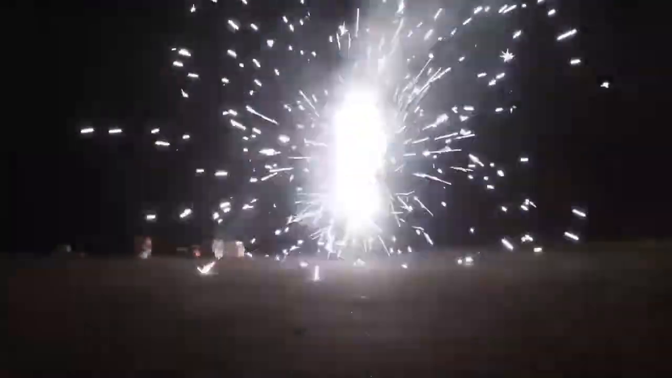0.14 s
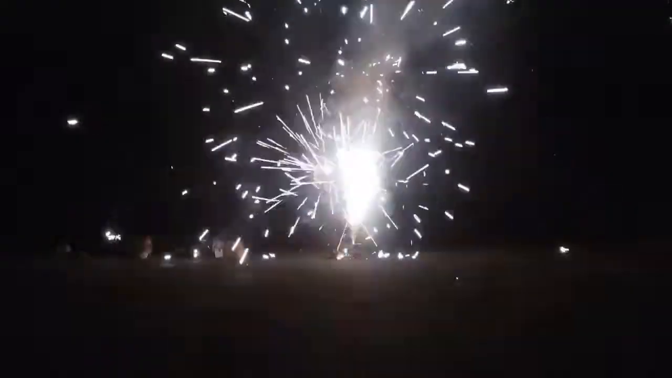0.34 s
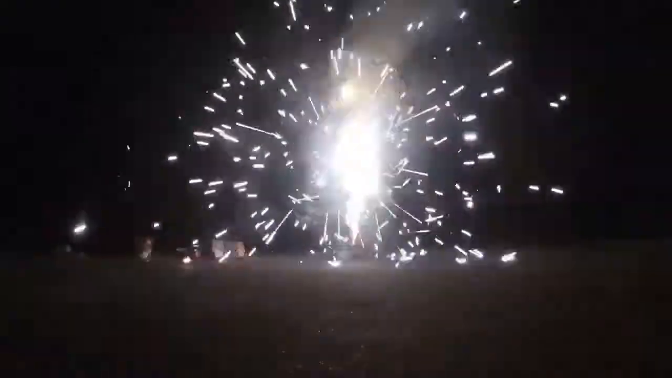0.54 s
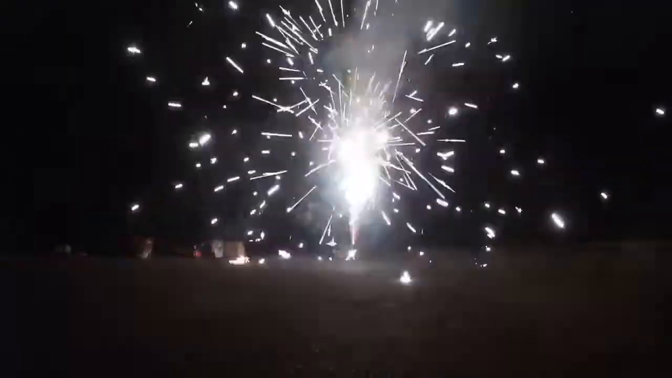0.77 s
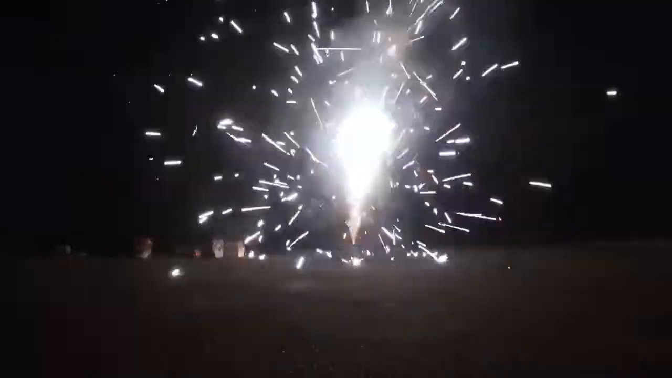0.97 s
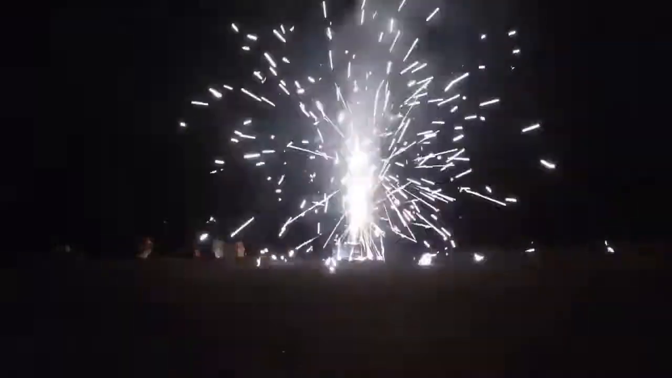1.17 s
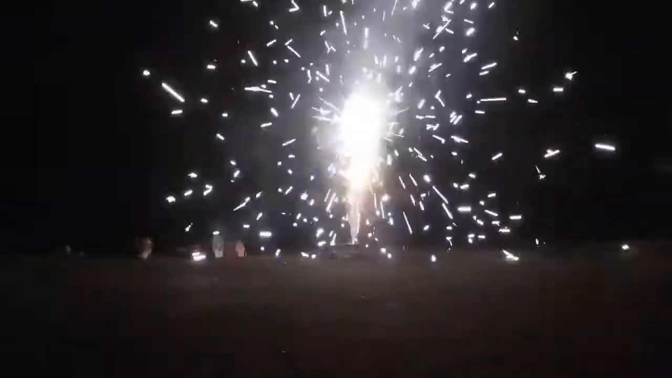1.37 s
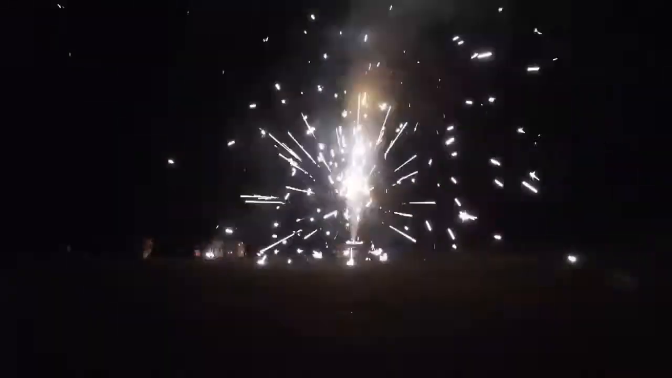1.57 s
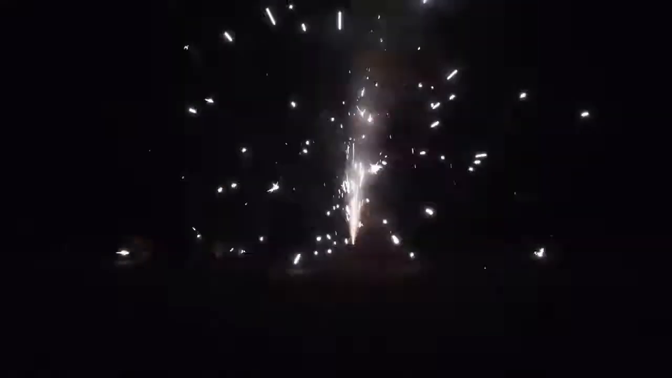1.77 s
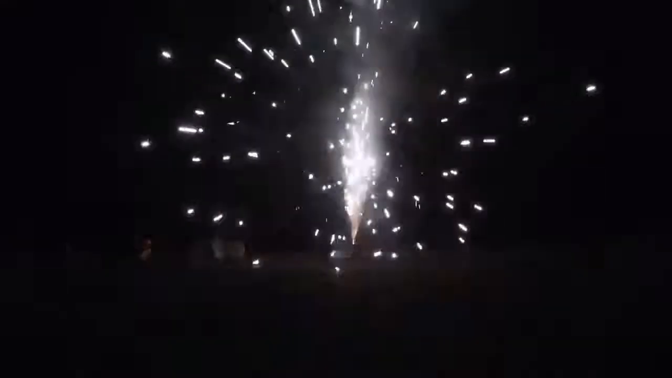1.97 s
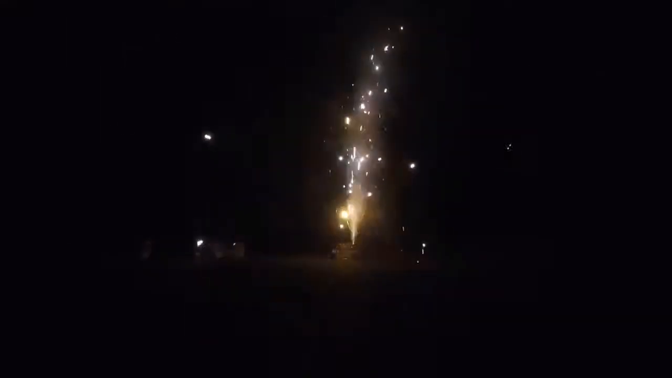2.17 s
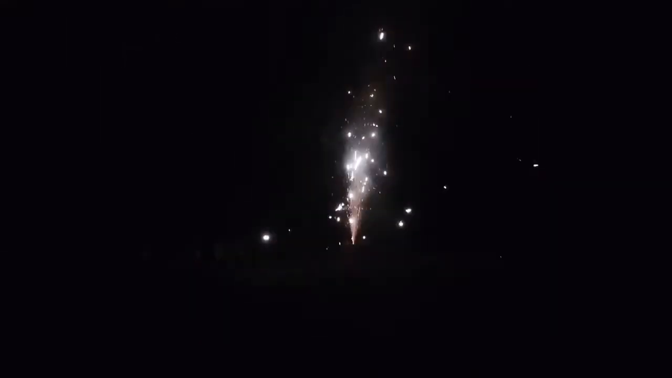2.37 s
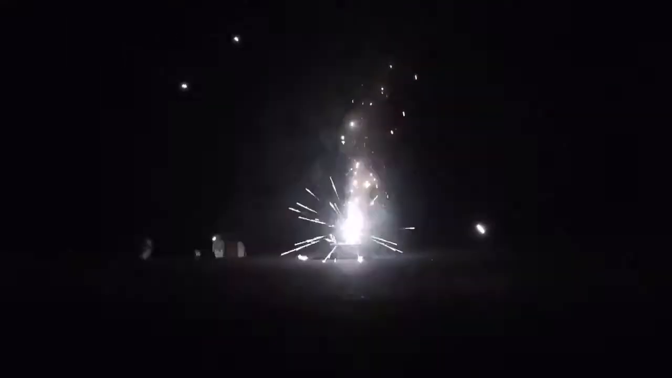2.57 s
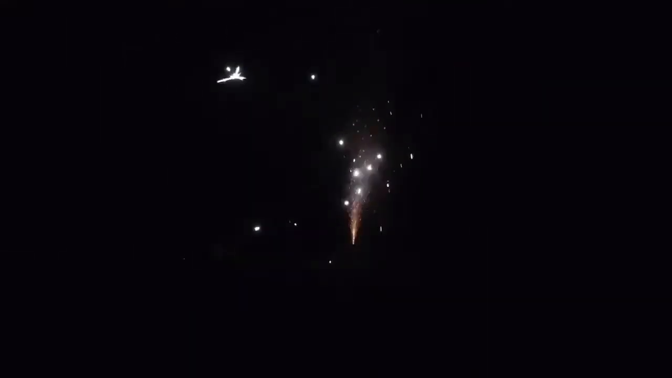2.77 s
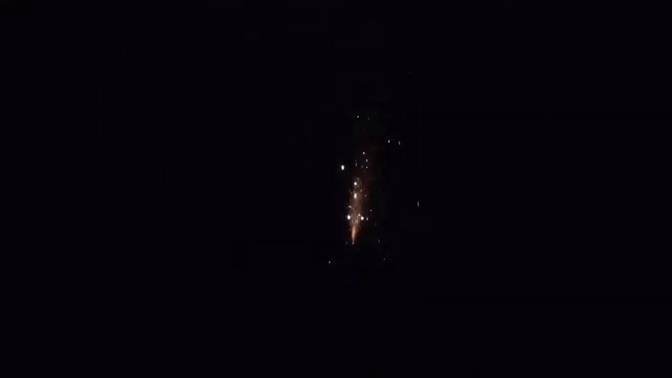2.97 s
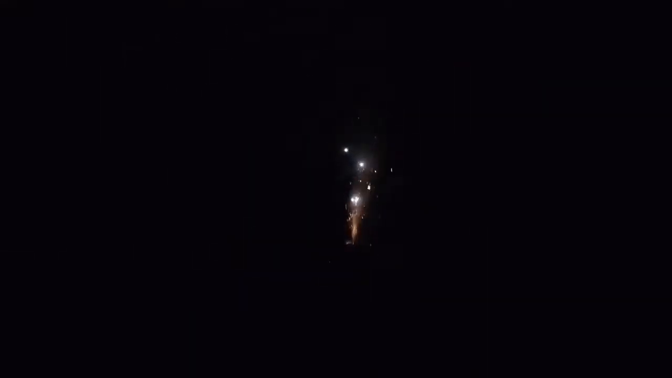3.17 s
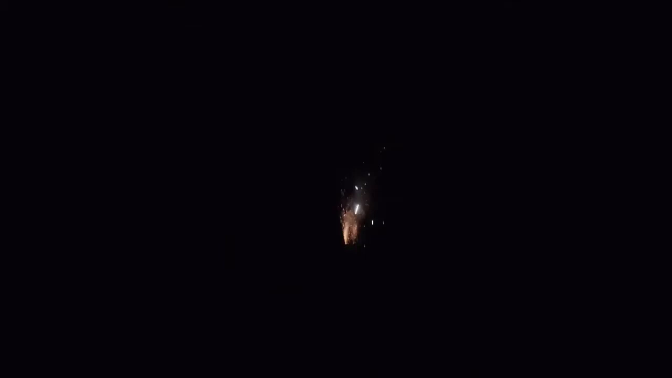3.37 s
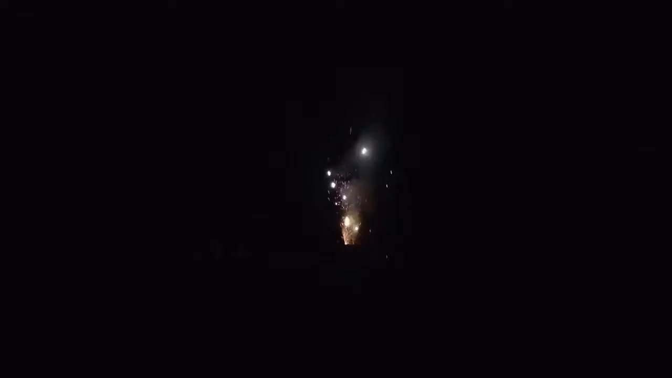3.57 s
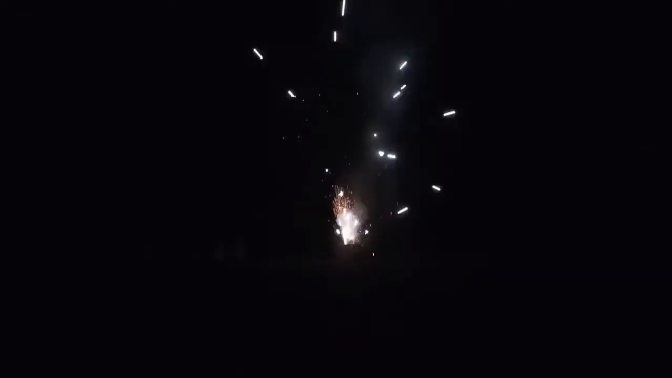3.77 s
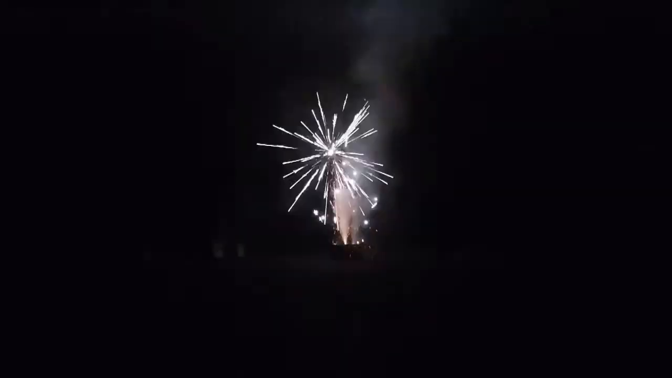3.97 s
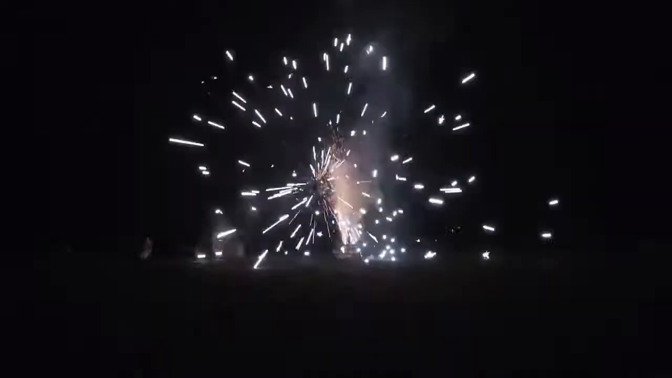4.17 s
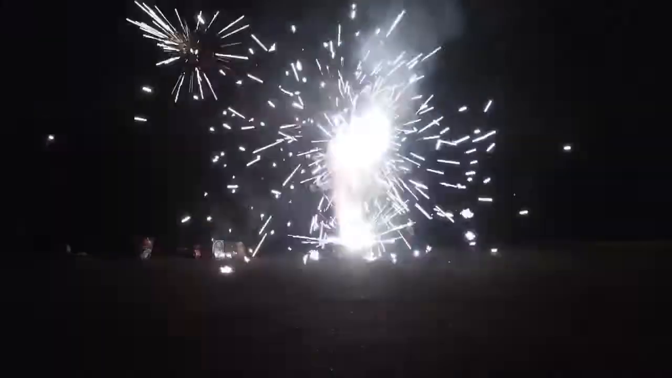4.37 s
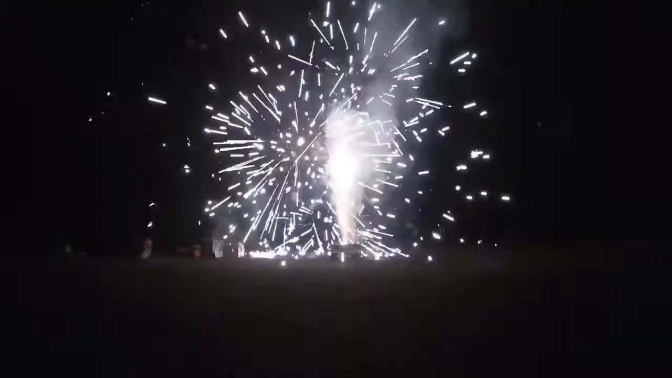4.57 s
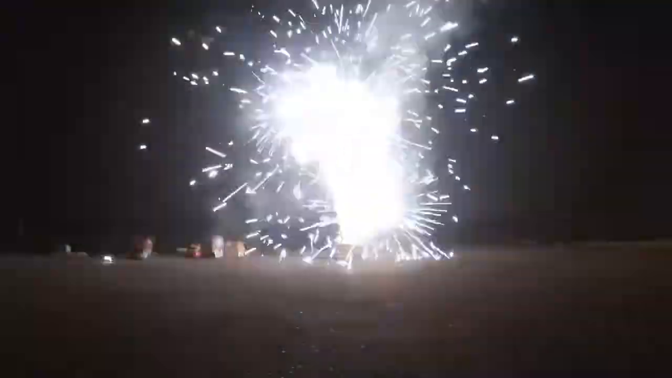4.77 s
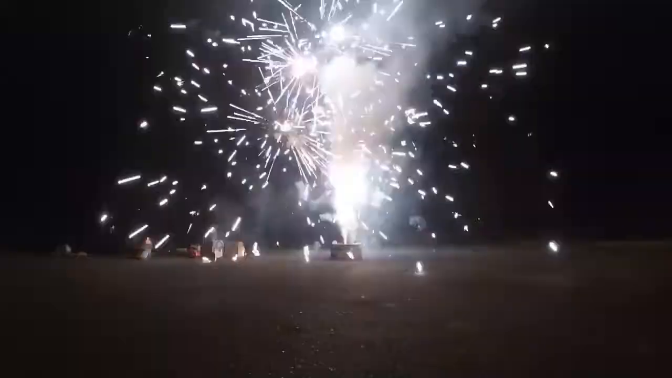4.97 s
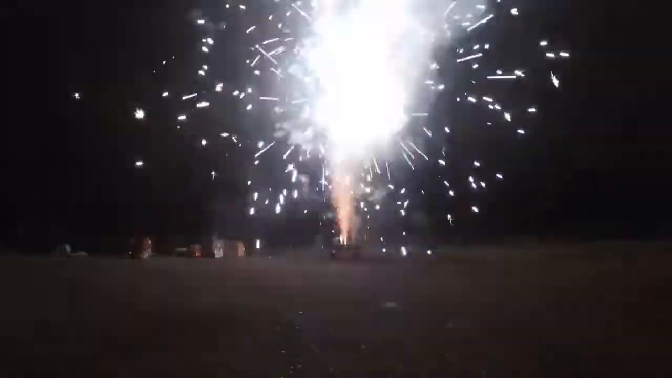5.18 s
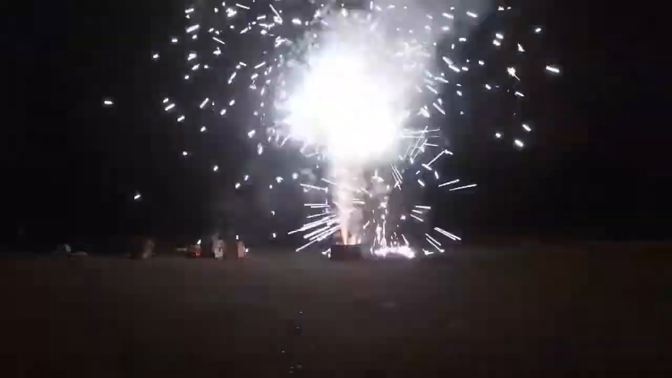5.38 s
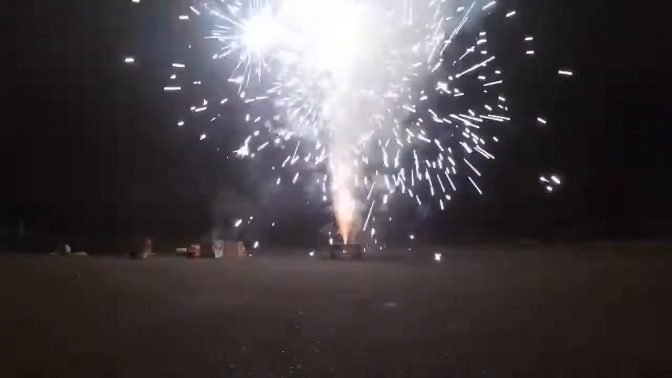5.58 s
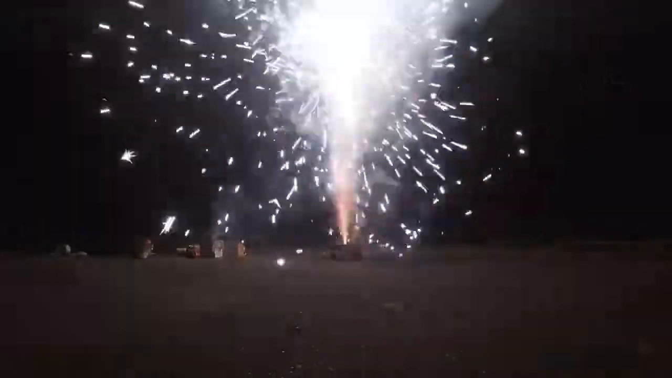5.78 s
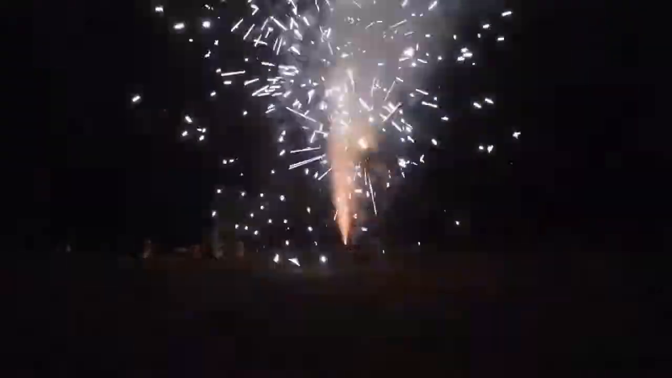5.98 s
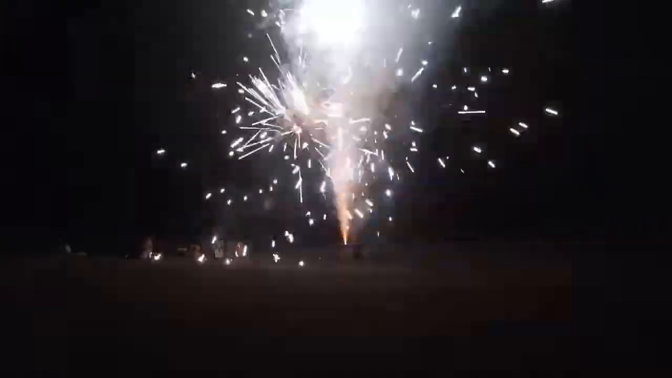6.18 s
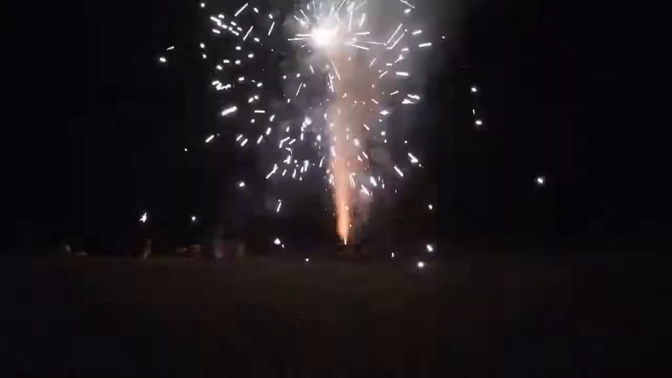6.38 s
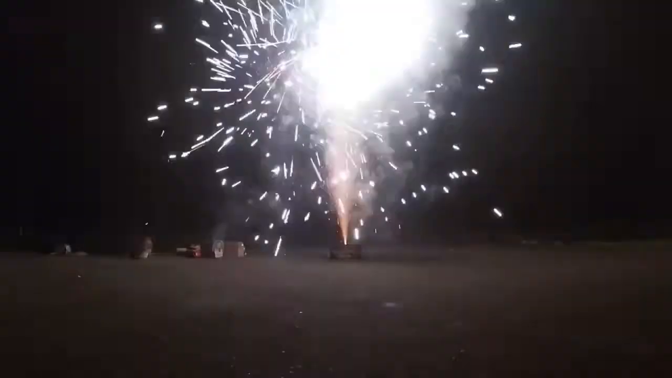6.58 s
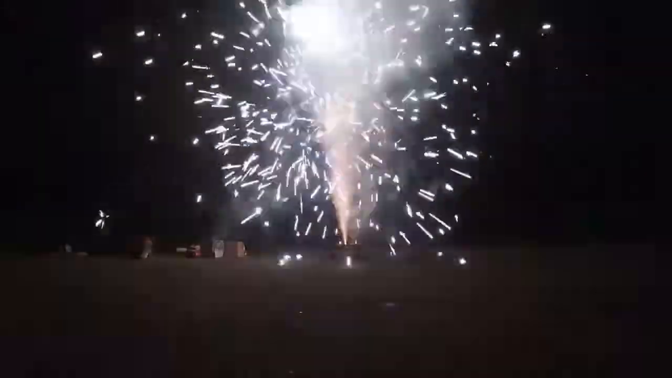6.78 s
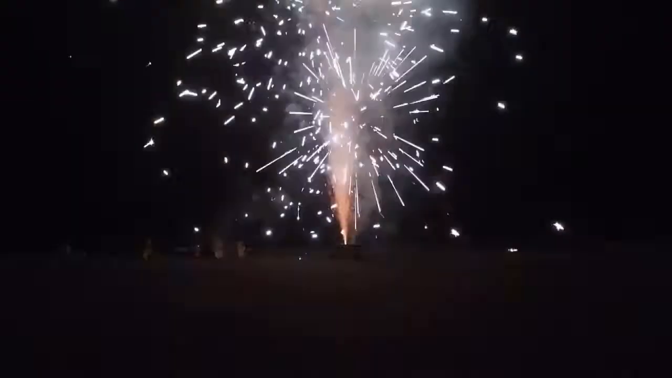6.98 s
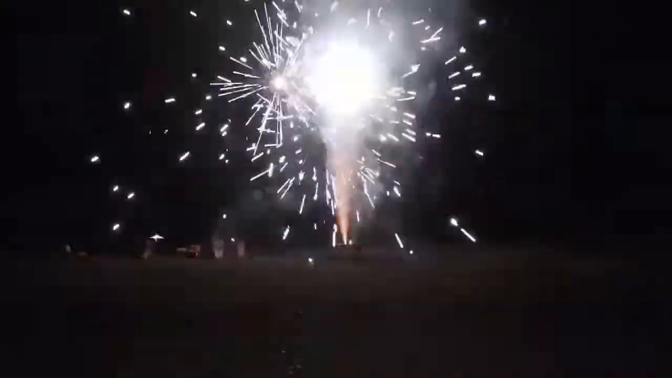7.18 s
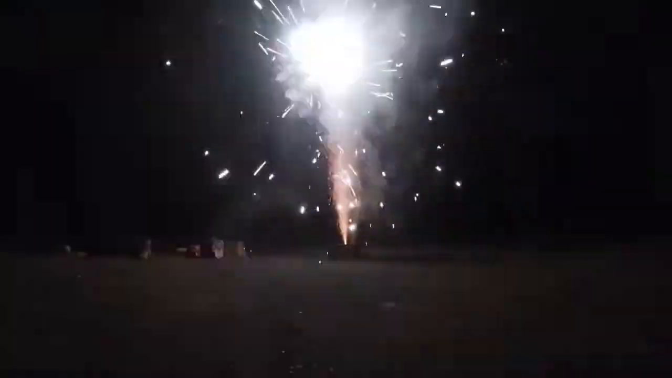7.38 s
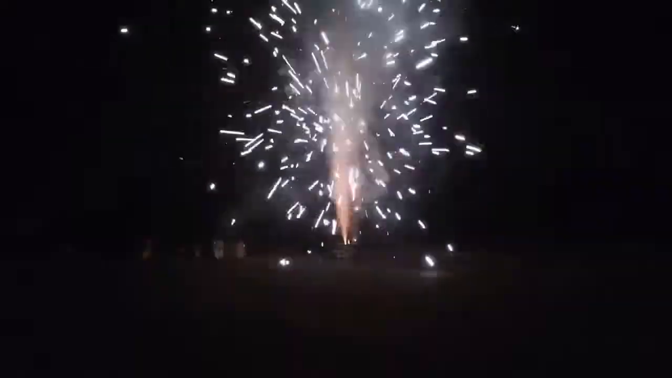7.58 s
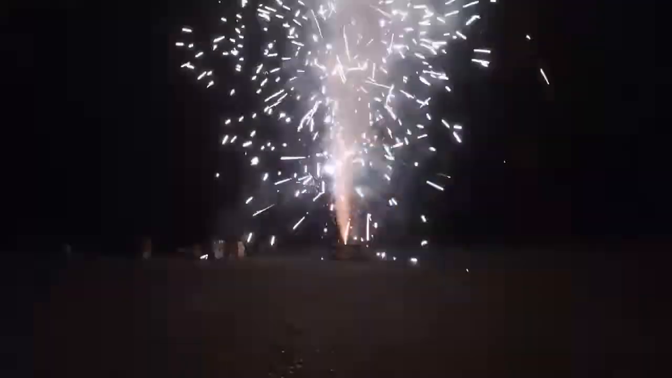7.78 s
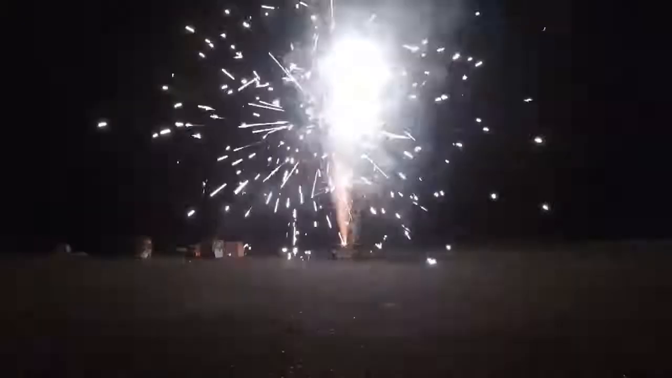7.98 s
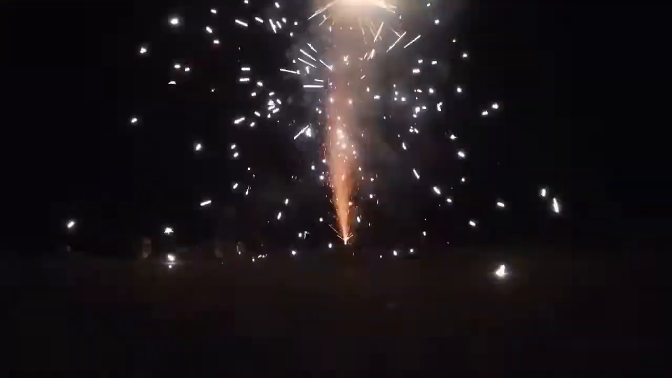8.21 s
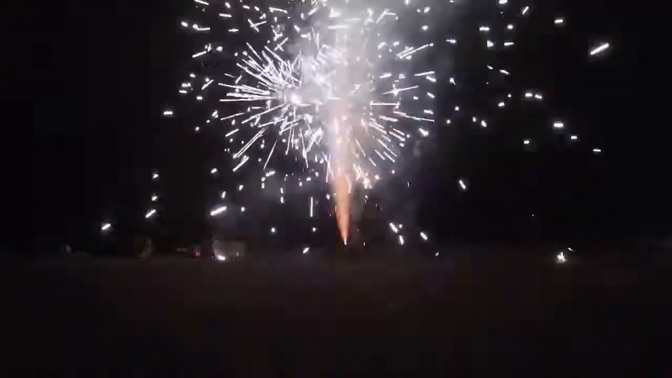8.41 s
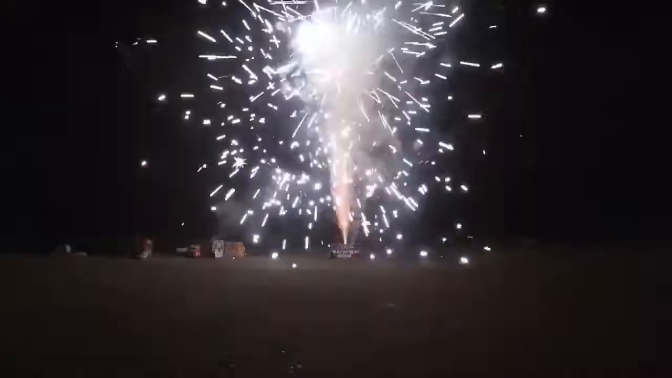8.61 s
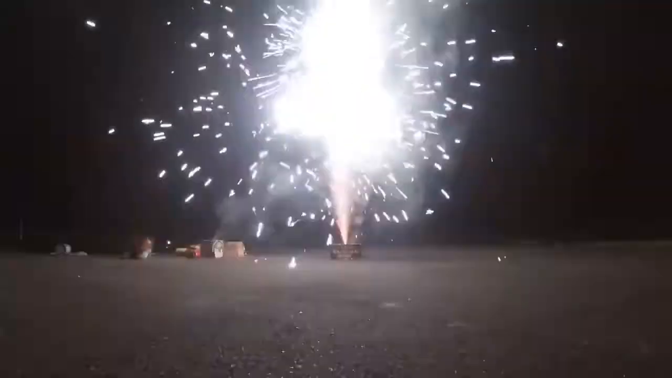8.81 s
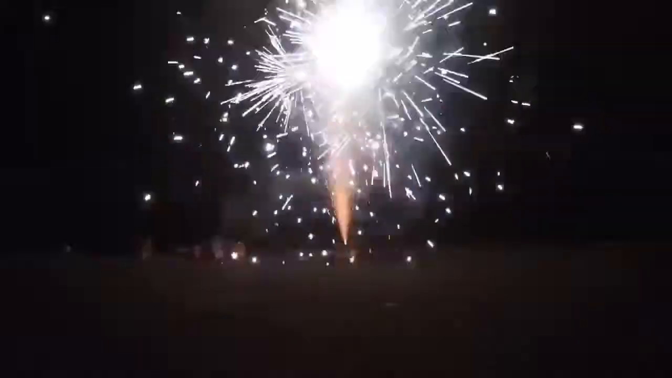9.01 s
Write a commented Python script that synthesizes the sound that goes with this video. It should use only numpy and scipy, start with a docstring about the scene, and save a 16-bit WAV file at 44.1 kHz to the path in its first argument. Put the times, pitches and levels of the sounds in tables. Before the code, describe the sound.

Outdoors at night, harsh, clipped crackles come in rapid uneven clusters, already under way at the start. They die down to sparse dry pops and quiet burning hiss, with swelling spurts of powder that stop abruptly. A denser barrage of bangs follows and never lets up. The close phone microphone distorts, sounding crunchy and thumpy, mid-heavy with dull treble, over a faint low rumble.

```python
"""Fountain firework crackling at night

It stands on open hard ground, a few metres from a phone. Small stars pop as clean blast waves.
Volleys of strong bangs overload the microphone: each crack is folded into a few random swings,
and a slow jolt up or down is left behind. Burning powder hisses in between as coloured noise, a thin
high band of noise shows when the crackle thins out, and a low rumble lies under it all."""
import sys
import numpy as np
from scipy import signal
from scipy.fft import rfft, irfft
from scipy.io import wavfile

SR = 44100
rng = np.random.default_rng(int(sys.argv[2]) if len(sys.argv) > 2 else 0)


def level_to_linear(level):
    """Convert decibel levels to linear amplitude factors, elementwise."""
    exponent = np.asarray(level, float) / 20
    return 10 ** exponent


def store_wav(level_fs):
    """Save 16-bit WAV to argv[1]."""
    pcm = np.round(np.clip(np.atleast_2d(level_fs), -1, 1) * 32767)
    wavfile.write(sys.argv[1], SR, pcm.T.astype(np.int16))


N = 399105  # length [samples]

# how the overload changes over time:
# (time [s], typical size of a folded crack [dB], typical wobble as it settles [dB])
OVERLOAD = [(0.0, -7, -8.5), (1.1, -9, -8), (1.5, -8, -14), (2.1, -5.5, -13), (2.3, -4.5, -6),
            (3.4, -8, -14), (3.7, 0, -20), (4.0, -4.5, -13.5), (4.6, -4, -15), (5.2, -5.5, -16),
            (6.0, -4, -13.5), (7.0, -4, -11), (8.0, -5.5, -13.5), (9.05, -5.5, -8)]
SPLIT_HZ = 6000  # the microphone's treble step


def band(x, hz, kind, order=2):
    """Butterworth filter that never looks ahead in time."""
    return signal.sosfilt(signal.butter(order, hz, kind, fs=SR, output="sos"), x)


def ring(x, hz, width_hz):
    """One resonance, gain 1 at its centre."""
    return signal.lfilter(*signal.iirpeak(hz, hz / width_hz, fs=SR), x)


def unit(x):
    """Scale to an rms of 1."""
    return x / np.sqrt(np.mean(x ** 2))


def curve(table):
    """The second column of a table, drawn as a line through every sample."""
    return np.interp(np.arange(N) / SR, np.array(table)[:, 0], np.array(table)[:, 1])


def spikes(at_s, size):
    """One-sample impulses at the given times."""
    return np.bincount(np.clip((at_s * SR).astype(int), 0, N - 1), size, N)


def play(trigger, shape):
    """Each impulse starts a copy of the shape."""
    return signal.fftconvolve(trigger, shape)[:N]


def blast(push_s, pull_s, pull):
    """Blast wave: a steep front and short push of air, then a longer suction."""
    t = np.arange(400) / SR
    push = np.exp(-t / push_s)
    suction = pull * t / pull_s * np.exp(1 - t / pull_s)
    return push - suction


def volleys(count=24):
    """Time and jolt of every bang: uneven gaps fill each volley from its first bang to its last."""
    # volleys of overloading bangs:
    # (first bang [s], last bang [s], bangs [count], strongest jolt left behind [dB])
    bursts = [(0.012, 0.0163, 2, -5), (0.0317, 0.0317, 1, -6), (0.0615, 0.0674, 2, -7),
              (0.0971, 0.1133, 3, -7), (0.1547, 0.1743, 4, -8), (0.1964, 0.2381, 5, -10),
              (0.2574, 0.2613, 2, -30), (0.2829, 0.2856, 2, -7), (0.3142, 0.3281, 2, -11),
              (0.3639, 0.3639, 1, -7), (0.3844, 0.3844, 1, -22), (0.4054, 0.4141, 2, -19),
              (0.4328, 0.4461, 3, -6), (0.4633, 0.4723, 2, -12), (0.5115, 0.5115, 1, -6),
              (0.5264, 0.5317, 2, -7), (0.563, 0.6039, 5, -10), (0.6273, 0.6273, 1, -15),
              (0.6434, 0.6727, 4, -9), (0.6949, 0.7038, 2, -8), (0.729, 0.729, 1, -6),
              (0.759, 0.759, 1, -9), (0.7734, 0.78, 2, -8), (0.8002, 0.8197, 5, -7),
              (0.8449, 0.8483, 2, -8), (0.8702, 0.8702, 1, -5), (0.8995, 0.8995, 1, -15),
              (0.928, 0.9485, 4, -9), (0.9663, 0.9761, 2, -9), (1.0012, 1.0181, 3, -8),
              (1.054, 1.054, 1, -7), (1.0932, 1.1091, 3, -7), (1.1356, 1.1505, 3, -10),
              (1.1729, 1.1785, 2, -14), (1.2353, 1.2353, 1, -10), (1.2829, 1.2916, 2, -9),
              (1.3105, 1.3105, 1, -6), (1.3488, 1.3488, 1, -15), (1.3846, 1.3846, 1, -6),
              (1.4743, 1.4743, 1, -25), (1.5369, 1.5471, 2, -15), (1.5672, 1.5672, 1, -7),
              (1.5985, 1.5985, 1, -9), (1.704, 1.7177, 3, -8), (1.7341, 1.7341, 1, -16),
              (1.886, 1.886, 1, -8), (2.0822, 2.0822, 1, -5), (2.2528, 2.2528, 1, -5),
              (3.3944, 3.3944, 1, -7), (3.4126, 3.4126, 1, -5), (3.648, 3.648, 1, -9),
              (3.7293, 3.7293, 1, -8), (3.7533, 3.7813, 5, -7), (3.8126, 3.84, 4, -11),
              (3.8932, 3.9072, 3, -13), (3.925, 3.9585, 6, -9), (3.9746, 3.9932, 5, -16),
              (4.0144, 4.0563, 6, -9), (4.0746, 4.0863, 3, -13), (4.1044, 4.112, 2, -9),
              (4.1357, 4.1357, 1, -12), (4.1733, 4.2025, 6, -7), (4.2186, 4.247, 5, -10),
              (4.2764, 4.2887, 3, -10), (4.3059, 4.3369, 5, -11), (4.3676, 4.4238, 9, -11),
              (4.4384, 4.4651, 6, -8), (4.488, 4.4929, 2, -10), (4.5124, 4.5297, 3, -9),
              (4.5487, 4.5487, 1, -5), (4.5679, 4.5706, 2, -8), (4.5932, 4.6141, 4, -8),
              (4.6396, 4.6449, 2, -12), (4.6615, 4.668, 2, -9), (4.6861, 4.6861, 1, -7),
              (4.7083, 4.7565, 8, -9), (4.7768, 4.7857, 2, -13), (4.8064, 4.832, 5, -12),
              (4.8466, 4.866, 5, -10), (4.8945, 4.9167, 3, -13), (4.9316, 4.9912, 12, -9),
              (5.0151, 5.075, 8, -13), (5.0956, 5.0956, 1, -8), (5.1159, 5.1341, 4, -13),
              (5.1498, 5.211, 13, -8), (5.228, 5.309, 14, -12), (5.3257, 5.344, 3, -15),
              (5.3608, 5.3681, 2, -15), (5.3829, 5.4117, 7, -12), (5.4337, 5.4904, 9, -11),
              (5.5334, 5.5555, 4, -8), (5.5784, 5.5866, 2, -15), (5.6105, 5.6212, 3, -13),
              (5.6446, 5.6446, 1, -8), (5.6741, 5.6741, 1, -9), (5.6887, 5.6985, 2, -9),
              (5.731, 5.74, 2, -7), (5.758, 5.758, 1, -6), (5.7756, 5.7756, 1, -6),
              (5.7975, 5.7975, 1, -13), (5.8246, 5.8246, 1, -7), (5.844, 5.8557, 3, -9),
              (5.8821, 5.9008, 4, -8), (5.9196, 5.9196, 1, -5), (5.9537, 5.9537, 1, -14),
              (5.9889, 5.9996, 4, -9), (6.0207, 6.0207, 1, -16), (6.0457, 6.0457, 1, -12),
              (6.0663, 6.0968, 6, -9), (6.1293, 6.1668, 7, -10), (6.2039, 6.325, 18, -9),
              (6.3412, 6.3464, 2, -9), (6.3719, 6.3756, 2, -7), (6.402, 6.4224, 5, -8),
              (6.443, 6.443, 1, -41), (6.4629, 6.4629, 1, -7), (6.4802, 6.4936, 3, -10),
              (6.5104, 6.5104, 1, -13), (6.5313, 6.5357, 2, -7), (6.55, 6.55, 1, -16),
              (6.5692, 6.5763, 2, -9), (6.5912, 6.6069, 4, -9), (6.6333, 6.637, 2, -8),
              (6.6801, 6.6801, 1, -12), (6.6996, 6.7044, 2, -7), (6.7284, 6.7538, 3, -12),
              (6.7833, 6.7833, 1, -6), (6.8004, 6.855, 6, -10), (6.8715, 6.8715, 1, -7),
              (6.9709, 6.9709, 1, -6), (6.9874, 6.9874, 1, -9), (7.0239, 7.036, 2, -8),
              (7.0563, 7.0634, 2, -10), (7.0894, 7.1057, 3, -10), (7.1562, 7.1751, 3, -8),
              (7.1961, 7.2179, 4, -10), (7.2955, 7.3024, 2, -6), (7.3225, 7.3349, 2, -7),
              (7.3524, 7.4022, 7, -9), (7.4251, 7.4414, 3, -9), (7.4707, 7.4751, 2, -25),
              (7.4957, 7.5181, 4, -9), (7.5356, 7.5447, 3, -10), (7.5669, 7.5669, 1, -6),
              (7.6008, 7.6159, 4, -9), (7.63, 7.7236, 11, -9), (7.7478, 7.7836, 5, -11),
              (7.807, 7.818, 2, -13), (7.8668, 7.8778, 2, -9), (7.904, 7.9183, 3, -8),
              (7.9344, 8.0053, 10, -8), (8.0348, 8.0791, 5, -9), (8.1151, 8.1192, 2, -9),
              (8.1371, 8.1555, 3, -12), (8.17, 8.17, 1, -15), (8.1844, 8.1942, 2, -4.5),
              (8.2201, 8.2432, 4, -10), (8.261, 8.275, 3, -9), (8.2982, 8.3884, 12, -10),
              (8.4041, 8.4176, 2, -14), (8.4452, 8.4641, 5, -13), (8.4851, 8.5094, 6, -8),
              (8.5377, 8.5635, 5, -10), (8.5864, 8.5975, 4, -11), (8.6396, 8.6444, 2, -7),
              (8.6661, 8.6861, 4, -11), (8.7078, 8.7289, 4, -11), (8.743, 8.751, 2, -10),
              (8.7652, 8.7652, 1, -5), (8.7835, 8.7869, 2, -15), (8.8101, 8.8481, 6, -10),
              (8.8679, 8.8679, 1, -6), (8.9056, 8.9196, 3, -7.5), (8.9407, 8.9407, 1, -7),
              (8.9569, 8.9794, 4, -7.5), (8.9966, 9.0026, 2, -15), (9.0167, 9.0167, 1, -11),
              (9.0308, 9.045, 3, -7)]
    gap_scatter = 0.7  # spread of the natural log of the gaps
    jolt_scatter_db = 3.5  # mean drop of the other jolts below the strongest
    first_s, last_s, number, strongest_db = (column[:, None] for column in np.transpose(bursts))
    place = np.arange(count)
    fired = place < np.rint(number)
    gaps = np.exp(gap_scatter * rng.standard_normal(fired.shape)) * fired * (place > 0)
    progress = np.cumsum(gaps, axis=1) / (gaps.sum(axis=1, keepdims=True) + 1e-9)
    bang_s = first_s + (last_s - first_s) * progress
    shortfall = rng.exponential(size=fired.shape)
    smallest = np.where(fired, shortfall, np.inf).min(axis=1, keepdims=True)
    jolt_db = strongest_db - jolt_scatter_db * (shortfall - smallest)
    return bang_s[fired], jolt_db[fired]


def bangs(bang_s, count=6):
    """The overloaded converter folds each front into a few swings of chance sign, size and sharpness."""
    chance = rng.standard_normal((len(bang_s), 2 * count + 2))
    db = np.interp(bang_s, *np.transpose(OVERLOAD)[:2]) + 1.87 * chance[:, -1]
    # uneven gaps put the swings around the bang; those near it are the largest
    later_s = np.cumsum(0.00024 * np.exp(0.5 * chance[:, :count]), axis=1) - 0.0008
    swings = chance[:, count:-2] * np.exp(-(later_s / 0.0012) ** 2)
    # whatever its shape, the fold carries about the same energy
    size = level_to_linear(db)[:, None] * swings / np.linalg.norm(swings, axis=1, keepdims=True)
    sharp = np.repeat(chance[:, -2] > 0, count)
    at_s = (bang_s[:, None] + later_s).ravel()
    sharp_spikes = spikes(at_s, 1.22 * size.ravel() * sharp)
    dull_spikes = spikes(at_s, size.ravel() * ~sharp)
    snap = play(sharp_spikes, blast(push_s=0.00011, pull_s=0.0003, pull=0.2))
    thud = play(dull_spikes, blast(push_s=0.00033, pull_s=0.00039, pull=0.24))
    return snap + thud + 0.16 * ring(snap + thud, 2320, 1050)


def jolts(bang_s, jolt_db):
    """Each overload leaves an offset, up or down, that swells, dies and undershoots through the coupling."""
    chance = rng.standard_normal((len(bang_s), 3))
    t = np.arange(3000) / SR
    swell = np.exp(-t / 0.0037) * (1 - np.exp(-(t / 0.0014) ** 2))
    up_or_down = np.sign(chance[:, 0])
    offset = play(spikes(bang_s + 0.0014, level_to_linear(jolt_db) * up_or_down), swell / swell.max())
    wobble = level_to_linear(np.interp(bang_s, *np.transpose(OVERLOAD)[::2]))
    for column, hz, share in ((1, 163, 1), (2, 327, 0.42)):
        shape = np.exp(-t / 0.0021) * np.sin(2 * np.pi * hz * t)
        offset = offset + play(spikes(bang_s + 0.00073, share * wobble * chance[:, column]), shape)
    # offsets that pile up the same way run out of headroom
    headroom = 0.55
    squeezed = offset / (1 + (offset / headroom) ** 4) ** 0.25
    return band(squeezed, 3.6, "high", order=1)


def pops():
    """Clean blast waves, each with a flipped ground bounce; the pressure swings back slowly."""
    # small stars: (time [s], level of the blast front before the resonances and the microphone [dB])
    stars = [(0.1382, -16), (0.981, -12), (1.4382, -16), (1.455, -17), (1.48, -13), (1.4947, -17),
             (1.5945, -18), (1.7596, -12.5), (1.7868, -17.5), (1.816, -19.5), (1.9121, -15), (1.9172, -12),
             (2.0224, -16.5), (2.071, -11.5), (2.1021, -15), (2.1914, -10), (2.1964, -14.5), (2.231, -6.5),
             (2.2804, -12), (2.4089, -12), (2.4652, -13.5), (2.5089, -12.5), (2.633, -10.5), (2.742, -10.5),
             (2.768, -6), (2.9593, -2), (3.2267, -22.5), (3.2886, -4.5), (3.3946, 1), (3.6, 0.5),
             (3.9438, -14), (4.3396, -11), (4.7931, -17), (4.8996, -3), (6.0243, -10), (6.1403, -10),
             (7.7446, -7), (8.1732, -11), (8.5716, -17)]
    star_s, db = np.transpose(stars)
    start_s = star_s - 0.0005
    # the bounce lag depends on the star's height, here left to chance
    lag_s = 0.0002 + 0.0003 * rng.random(len(star_s))
    fronts = spikes(start_s, level_to_linear(db)) - 0.35 * spikes(start_s + lag_s, level_to_linear(db))
    wave = play(fronts, blast(push_s=0.00007, pull_s=0.00024, pull=0.5))
    return wave + 1.4 * ring(wave, 230, 200) + 0.6 * ring(wave, 2600, 1200) + 1.2 * ring(wave, 4900, 800)


def surroundings(tail_db, t60_s, count=13000):
    """Nearby surfaces return smeared echoes and a scattered tail that fades by 60 dB in t60_s."""
    # nearby surfaces: (delay [s], level [dB])
    surfaces = [(.0063, -41.5), (0.0121, -55)]
    t = np.arange(count) / SR
    shape = level_to_linear(tail_db - 60 * t / t60_s) * (t > surfaces[0][0] - 0.001)
    for delay_s, db in surfaces:
        shape = shape + level_to_linear(db) * np.exp(-((t - delay_s) / 0.00021) ** 2)
    return shape * rng.standard_normal(count)


def haze(cracks):
    """The treble smears into a short haze of noise on both sides of every crack."""
    centre_hz, width_hz = 5300, 700  # the width is that of one pass; two passes are narrower
    narrow_db, top_db, spread_s = -12, -27, 0.0028  # levels relative to the smeared treble
    t = np.arange(-600, 601) / SR
    spread = np.exp(-np.abs(t) / spread_s)
    smeared = signal.fftconvolve(band(cracks, 3000, "high") ** 2, spread / spread.sum(), "same")
    noise = rng.standard_normal((2, N))
    narrow = ring(ring(noise[0], centre_hz, width_hz), centre_hz, width_hz)
    top = band(noise[1], SPLIT_HZ, "high", order=4)
    return np.sqrt(np.abs(smeared)) * (level_to_linear(narrow_db) * unit(narrow) + level_to_linear(top_db) * unit(top))


def spurts(column):
    """Spurts of powder swell and stop short: one gain column, in dB, at every sample."""
    # (start of the swell [s], start of the stop [s], hiss gain [dB], high band gain [dB])
    surges = [(2.98, 3.166, 12.5, 8), (3.436, 3.594, 7, 21.5)]
    rise_s, stop_s = 0.063, 0.015
    t = np.arange(N) / SR
    gain_db = np.zeros(N)
    for row in surges:
        rising = (t - row[0]) / rise_s
        falling = (row[1] - t) / stop_s + 1
        gain_db = gain_db + row[column] * np.clip(np.minimum(rising, falling), 0, 1)
    return gain_db


def hiss():
    """Burning powder: coloured noise with a quick sputter."""
    # hiss between the cracks, before the microphone's treble step: (time [s], level [dB])
    powder = [(0.0, -43), (0.8, -45.5), (1.5, -49.5), (2.3, -53.5), (2.5, -58.5), (2.7, -61), (2.95, -52.5),
              (3.19, -56.5), (3.3, -46.5), (3.63, -48), (3.8, -40.5), (4.5, -40), (5.0, -39), (6.5, -41),
              (7.0, -45), (7.5, -40.5), (8.0, -42.5), (9.05, -39)]
    # tone of the hiss: (frequency [Hz], relative level [dB])
    tone = [(60, -20), (110, -9), (180, 9), (500, 0), (1400, -1.5), (2400, -1), (3300, -5.5), (4300, -3.5),
            (5500, -1.5), (16000, -2.5)]
    hz, db = np.transpose(tone)
    colour = level_to_linear(np.interp(np.log(np.fft.rfftfreq(N, 1 / SR) + 1), np.log(hz), db))
    noise = irfft(rfft(rng.standard_normal(N)) * colour, N)
    spurt_db = spurts(column=2)
    noise = noise + 0.06 * spurt_db * ring(noise, 2200, 2000)  # a spurt is fuller in the middle
    sputter_db = 1.2 * unit(band(rng.standard_normal(N), 60, "low"))
    # the level counts what lies between 1 and 6 kHz
    even = noise / np.std(band(noise, (1000, 6000), "band", order=4))
    return even * level_to_linear(curve(powder) + spurt_db + sputter_db)


def high_band():
    """A narrow wavering hiss that swells with the powder spurts."""
    # heard while the crackle thins out: (time [s], level before spurts and throb [dB])
    thin_hiss = [(1.4, -83), (2.3, -63), (2.5, -70), (3.3, -70), (3.63, -70), (3.8, -47), (4.0, -58),
                 (4.3, -85)]
    throb_db = 2 * unit(band(rng.standard_normal(N), 40, "low"))
    noise = unit(band(rng.standard_normal(N), (7100, 8100), "band", order=4))
    return noise * level_to_linear(curve(thin_hiss) + spurts(column=3) + throb_db)


def rumble():
    """The low night-time floor: noise between 20 and 90 Hz."""
    return level_to_linear(-60) * unit(band(rng.standard_normal(N), (20, 90), "band"))


def treble_step(x, shelf_db):
    """Everything above the step is much weaker, with a slight lift at the very top."""
    low = signal.fftconvolve(x, signal.firwin(121, SPLIT_HZ, fs=SR), "same")
    treble = x - low
    return low + level_to_linear(shelf_db) * (treble + 1.32 * ring(treble, 16400, 3700))


def capsule(x):
    """The microphone: a bass cut, a port resonance, a small dip, and weak treble above a steep step."""
    x = band(x, 94, "high", order=3)
    x = x + 0.81 * ring(x, 5540, 2540) - 0.42 * ring(x, 3310, 420)
    return treble_step(x, -15.5)


def scene():
    """Cracks and their echoes pass the capsule; the jolts arise behind it."""
    bang_s, jolt_db = volleys()
    small, big = pops(), bangs(bang_s)
    # a bang is far louder than its folded crack, so its tail stands out more
    air = small + play(small, surroundings(tail_db=-37, t60_s=0.049))
    air = air + big + play(big, surroundings(tail_db=-36, t60_s=0.048))
    cracks = capsule(air) + haze(small + big) + jolts(bang_s, jolt_db)
    background = treble_step(hiss(), -29) + high_band() + rumble()
    return (cracks + background)[None]


def low_pass(x):
    """Removes everything above the highest recorded frequency."""
    return signal.sosfilt(signal.butter(12, 16690, fs=SR, output="sos"), x)


def record(dry):
    """The phone cuts the very top of the treble with a steep filter."""
    top_hz = 15780
    cut = signal.sosfilt(signal.ellip(8, 0.2, 26, top_hz, fs=SR, output="sos"), dry)
    return low_pass(cut)


dry = scene()
out = record(dry)
store_wav(out)
```